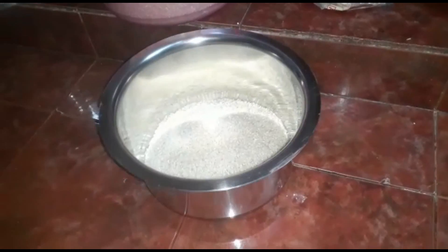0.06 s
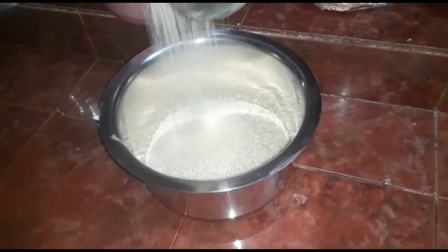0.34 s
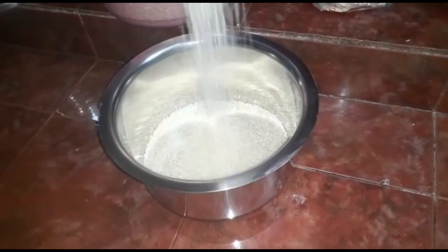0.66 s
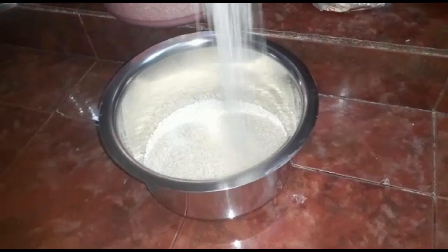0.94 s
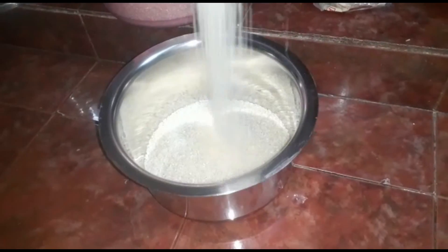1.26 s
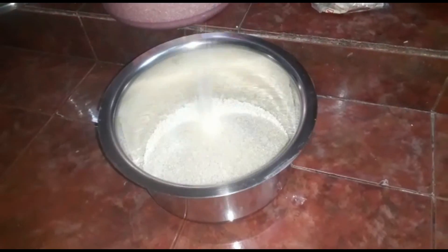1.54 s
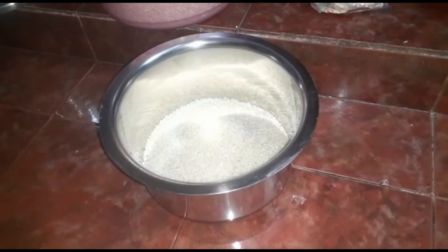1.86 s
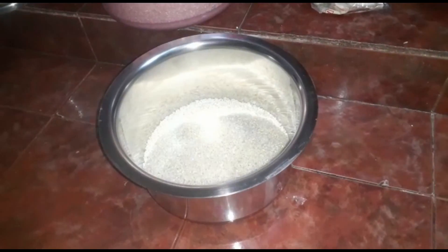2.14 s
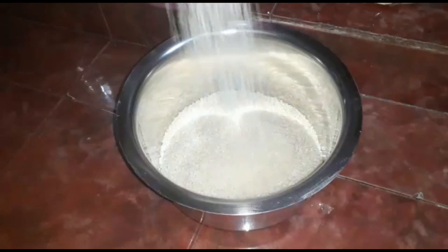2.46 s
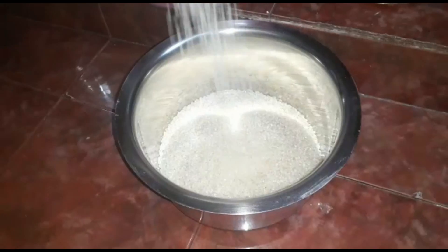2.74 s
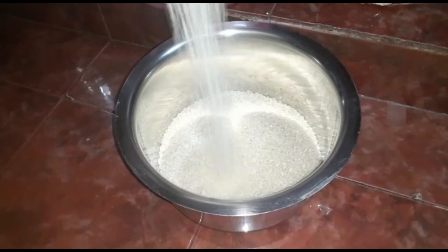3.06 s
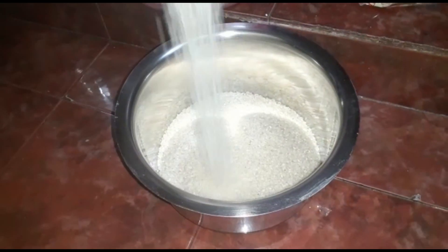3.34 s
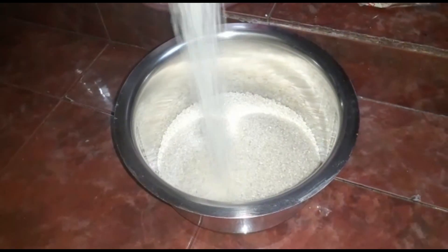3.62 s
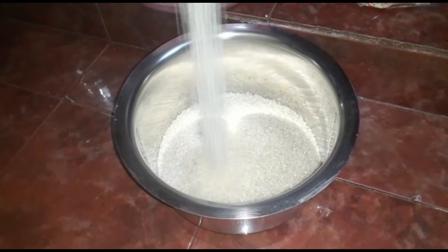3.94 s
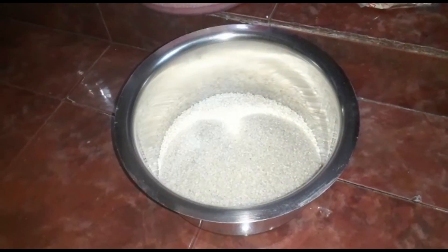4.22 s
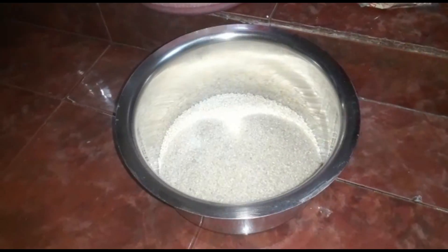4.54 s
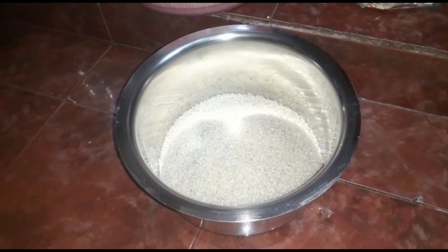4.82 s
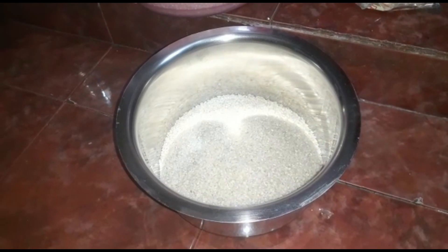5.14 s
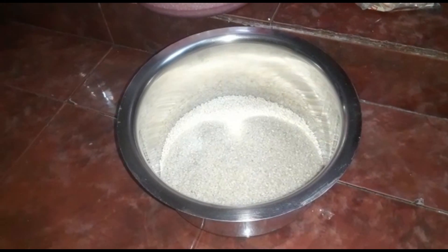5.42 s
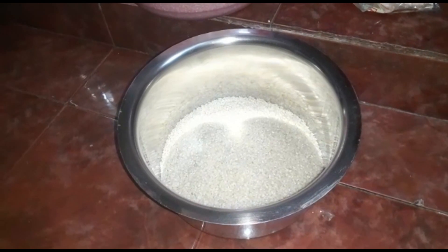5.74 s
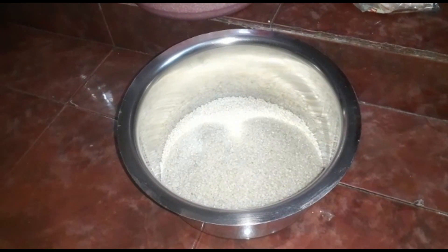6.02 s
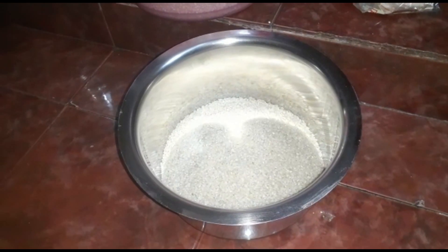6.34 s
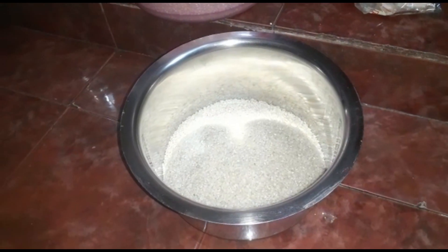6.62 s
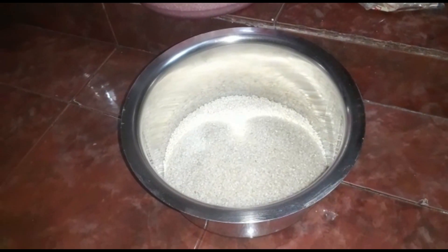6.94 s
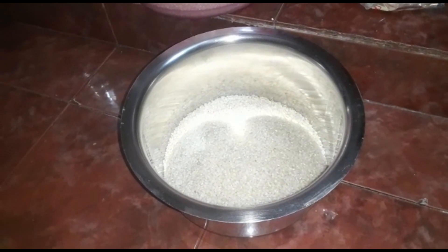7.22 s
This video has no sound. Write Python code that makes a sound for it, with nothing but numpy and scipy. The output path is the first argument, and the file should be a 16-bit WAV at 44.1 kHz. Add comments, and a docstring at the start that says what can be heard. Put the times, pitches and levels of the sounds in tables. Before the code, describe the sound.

In a tiled kitchen, raw rice streams into a steel bowl close by, hissing and crackling with a shimmering metallic ring. It pours twice, each time for under two seconds, with a quiet scrape of grains in a metal cup between. The last few seconds are much quieter: distant night insects, a dull household hum and a draught softly buffeting the microphone.

```python
"""Dry rice hisses into a ringing steel bowl, poured twice from a metal cup in a tiled kitchen.
Thousands of tiny impacts crackle on the heap and keep the bowl's modes singing; between the pours
grains rustle and scrape as the cup is refilled. Night insects shrill steadily outside, a motor hums
in the house, and a draught flutters on the two microphone ports."""
import sys
import numpy as np
from scipy import signal
from scipy.fft import rfft, irfft, next_fast_len
from scipy.io import wavfile
from scipy.ndimage import map_coordinates

SR = 44100
rng = np.random.default_rng(int(sys.argv[2]) if len(sys.argv) > 2 else 0)


def digitize_waveform(pressure):
    """Quantize a signal to 16-bit integers and store it at the path in sys.argv[1].

    Rows of a 2-D input are taken as channels; values are limited to [-1, 1].
    """
    field = np.atleast_2d(pressure).T
    bounded = np.clip(field, -1, 1)
    quanta = np.round(bounded * 32767).astype(np.int16)
    wavfile.write(sys.argv[1], SR, quanta)


N = 320607


def rice():
    """The stream hisses on the heap, rings the steel wall and rustles over the lip of the cup."""
    # bright hiss of the heap: f/Hz, level/dB
    heap_eq = [(3000, -42), (4500, -9), (5700, -5), (6150, -6), (6700, 0.5), (7400, -6), (7850, 1.5),
               (8300, -6), (9150, 1), (9900, -5.5), (10700, -3), (12300, -2), (14000, -1.5), (15600, 2.5)]
    # its stereo spread: f/Hz, left over right/dB
    heap_pan = [(6000, -5), (8000, -5.5), (8600, 8), (9300, 14), (10500, 10), (13000, 3), (14000, 3),
                (15600, -6)]
    # bowl modes; the rising heap damps the low ones: f/Hz, first pour level/dB, second pour level/dB
    bowl_modes = [(2320, -3, -8), (2409, -3, -12), (2503, -4, -4), (2587, 1, -8), (2632, -3, -6),
                  (2939, -11, -14), (3227, -9, -11), (3381, 0, -10), (3464, 1, -5), (3535, 1, 3),
                  (3590, 0, -3), (3642, 6, 7), (3739, 1, 0), (3817, 3, 0), (3911, 4, 3), (4175, 1, -5),
                  (4309, 4, 0), (4369, 5, 4), (4541, -2, -4), (4657, 1, 1), (4790, 2, 3), (4901, 4, 4),
                  (4947, 6, 5), (5063, 0, 3), (5125, 4, 6), (5190, 2, 7), (5292, 3, 0), (5430, 3, 2),
                  (5575, 1, 4), (5720, -4, 1), (5885, -7, 2), (6160, 5, 4), (6290, 3, 9), (6412, 6, 9),
                  (7827, 5, 10), (8570, 5, 5), (8926, 3, 7), (9076, 5, 9), (9356, 8, 8), (9593, 8, 5),
                  (10218, 1, 6), (10390, 3, 5), (10724, 6, 5), (10907, 3, 9), (11294, 5, 6), (11682, 6, 8),
                  (11908, 7, 9), (12640, 8, 8), (12780, 6, 11), (13092, 2, 7), (13221, 9, 9), (13792, 7, 5),
                  (13943, 7, 7), (14201, 9, 5), (14427, 10, 7), (14729, 7, 8), (15299, 9, 8)]
    # darker rustle of rice sliding out of the cup: f/Hz, level/dB
    slide_eq = [(300, -7), (800, -0.5), (1300, -3.5), (1900, 2.5), (2500, -1.5), (3050, -6.5), (3750, -5),
                (4060, -17), (8000, -35)]
    heap_gain, walls, slide_gain = stream()
    grains = impacts(rate=3600, spread_db=3.2, contact_s=0.0006) * amp(surges())
    hiss = coloured(grains + amp(-7) * ring(grains, t60=0.1), heap_eq, heap_pan)
    bowl = 0
    hz, *levels_by_pour = np.transpose(bowl_modes)
    for (gain, t60), db in zip(walls, levels_by_pour):
        bowl = bowl + steel(grains * gain, np.column_stack([hz, db]), t60, split=0.002)
    slide = coloured(impacts(rate=1100, spread_db=2.4, contact_s=0.0014), slide_eq)
    return hiss * heap_gain + bowl * sides(-0.16) + slide * slide_gain * sides(-1.9)


def stream():
    """One flow rides three faders: the heap (stereo), the steel wall (gain, t60 per pour) and the lip."""
    # how hard the rice runs, one envelope per pour: t/s, level/dB
    flows = [
        [(.254, -25), (.32, -19.5), (.38, -19.5), (.43, -19), (.6, -24), (.77, -25), (1.03, -19.5), (1.34, -18),
         (1.48, -21), (1.58, -18.5), (1.69, -16.5)],
        [(2.512, -17.5), (2.625, -14.5), (2.66, -21), (2.78, -19), (2.91, -22), (2.98, -24), (3.03, -21),
         (3.25, -17), (3.33, -20), (3.72, -18), (4.01, -22), (4.22, -20)],
    ]
    # the pours; the fuller bowl rings more briefly: start/s, stop/s, release/(dB/s), rustle over flow/dB,
    # heap left over right/dB, steel over flow/dB, steel swell as the cup tips/(dB/s), steel t60/s
    pours = [(0.244, 1.666, 108, -14, 1.5, -5.5, 2, 0.22), (2.506, 4.232, 230, -20, 3, -6.5, 4, 0.2)]
    emptying_s, emptying_db, heap_db = 0.08, -6.5, 3.8
    t = np.arange(N) / SR
    heap, walls, slide = 0, [], 0
    for (start, stop, release, rustle_db, pan_db, wall_db, wall_swell, t60), flow in zip(pours, flows):
        front_db = gate_db(start, stop, rise=2497, fall=0)  # the stream lands almost at once
        first_grains_db = -31 + gate_db(start, stop, rise=253, fall=0)  # a few grains run ahead
        flow_db = envelope(flow) + np.maximum(front_db, first_grains_db)
        flow_db -= release * np.maximum(t - stop, 0)
        tipped_s = np.clip(t, start, stop) - start
        emptied = np.clip(1 + (t - stop) / emptying_s, 0, 1)  # the last rice leaves the cup
        heap = heap + amp(flow_db + heap_db) * sides(pan_db)
        walls.append((amp(flow_db + wall_db + wall_swell * tipped_s), t60))
        slide = slide + amp(flow_db + rustle_db + emptying_db * emptied)
    return heap, walls, slide


def surges():
    """The stream falls in uneven strands, now and then in a clump: dB around its flow."""
    # clumps that land at once: t/s, boost/dB, decay time/s
    clumps = [(0.253, 7, .012), (.311, 4, .005), (.332, 5, .004), (.662, 6, .012), (.68, 7, .01),
              (.78, 6, .008), (1.119, 5, .008), (1.316, 4, .006), (1.5, 5, .006), (2.535, 3, .005),
              (2.682, 5, .008), (2.759, 5, .016), (2.95, 6, .008), (2.991, 11, .026), (3.408, 4, .006),
              (3.891, 4, .008)]
    small_per_s, small_db, small_decay_s = 16, 3, 0.01  # lesser clumps fall at random
    t = np.arange(N) / SR
    clumps_db = sum(db * (t >= s) * np.exp(-np.abs(t - s) / decay) for s, db, decay in clumps)
    small_hits = small_db * (rng.random(N) < small_per_s / SR)
    small_clumps_db = signal.lfilter([1], [1, -np.exp(-1 / (small_decay_s * SR))], small_hits)
    strands_db = 0.29 * wobble(45) + 0.24 * wobble(18)
    return clumps_db + strands_db + small_clumps_db


def impacts(rate, spread_db, contact_s):
    """Grains land at random, rate a second; each is a tiny crackle of its own size."""
    lands = rng.random(N) < rate / SR
    size = amp(spread_db * np.minimum(rng.standard_normal(N), 2))
    energy = signal.lfilter([1], [1, -np.exp(-2 / (contact_s * SR))], lands * size ** 2)
    return unit(np.sqrt(energy) * noise())


def steel(x, modes, t60, split):
    """x rings steel modes (f/Hz, level/dB), each a beating pair detuned by a share of its pitch."""
    shimmer_db, bend_share = 1.5, 0.0016
    hz, db = np.transpose(modes)
    hz, db = np.outer(hz, [1 - split, 1 + split]).ravel(), np.repeat(db, 2)
    t = np.arange(SR) / SR
    out, block = np.zeros((2, N)), SR // 8
    for start in range(0, N, block):
        # as the point of impact wanders, each mode is struck harder or softer and bends a little
        strength, bend = rng.standard_normal((2, len(hz)))
        phase = rng.random((2, len(hz)))
        part = x[:, start:start + block]
        if np.abs(part).max() > 1e-4:
            bent_hz = np.rint(hz * (1 + bend_share * bend)).astype(int)
            lines = np.zeros((2, SR // 2 + 1), complex)
            lines[:, bent_hz] = amp(db + shimmer_db * strength) * np.exp(2j * np.pi * phase)
            tail = irfft(lines) * amp(-60 * t / t60)
            add(out, start / SR, signal.fftconvolve(part, tail / np.linalg.norm(tail[0]), axes=1))
    return out


def loose_grains():
    """Rice shifts in the cup before each pour with a fine, dry rustle."""
    # the shifts: start/s, stop/s, level/dB
    shifts = [(0, 0.254, -34.5), (1.844, 2.013, -33), (2.123, 2.514, -31.8)]
    # their tone: f/Hz, level/dB
    rustle_eq = [(1500, -7.5), (5900, -13.5), (6200, 6.5), (7700, 3.5), (8150, 1), (9000, -10),
                 (10500, -64), (11400, -25), (11700, 0), (15600, -1.5)]
    gain = sum(amp(db + gate_db(start, stop, rise=197, fall=197)) for start, stop, db in shifts)
    grains = impacts(rate=2500, spread_db=2.2, contact_s=0.0008) * amp(0.8 * wobble(40))
    return coloured(grains, rustle_eq) * gain * sides(-3.5)


def stray_grain(s, db, t60):
    """One grain drops into the bowl: a tick of fast-dying noise."""
    # its bright tone: f/Hz, level/dB
    tick_eq = [(4000, -30), (8500, 0), (15600, 0)]
    age = np.arange(N) / SR - s
    return coloured(noise(), tick_eq) * (age >= 0) * amp(db - 60 * np.abs(age) / t60)


def scoop():
    """Grains scrape the thin metal cup as it is refilled and keep its modes singing."""
    # envelope of the scrape: t/s, level/dB
    stroke = [(1.5, -42), (1.72, -32), (1.92, -34), (2.2, -45.5), (2.45, -45.5), (2.6, -35)]
    # the cup's modes: f/Hz, level/dB
    cup_modes = [(2320, -8), (2635, -6), (2939, -7), (3225, -11), (3435, -3), (3467, 0), (3523, 1),
                 (3817, -6), (3940, -6), (4369, -3), (4624, -4), (4770, -6), (4891, -1), (4925, -2),
                 (5125, -6), (5292, 0), (5440, -6), (5730, -7), (6195, -2), (6288, -1), (7582, 0),
                 (8646, -6), (9475, -8)]
    gain = amp(envelope(stroke, outside=-120))
    scrape = impacts(rate=1700, spread_db=4.5, contact_s=0.00041) * gain
    return steel(scrape, cup_modes, t60=0.48, split=0.0012) * sides(-1.5)


def knocks():
    """Light bumps against the cup: a short crack, a hollow, damped note and a faint metal ring."""
    # the bumps: t/s, relative level/dB, left over right/dB
    bumps = [(0.212, -25, -1), (1.037, -14, -16), (1.076, -19, -17)]
    # what they ring: f/Hz, level/dB, t60/s
    modes = [(150, -13, 0.037), (1140, -2.5, 0.032), (1104, 0.5, 0.028), (2240, 0, 0.019), (2612, -12, 0.6),
             (3464, -23, 0.52)]
    out, t = np.zeros((2, N)), np.arange(SR) / SR
    note = sum(amp(db - 60 * t / t60) * np.sin(2 * np.pi * hz * t) for hz, db, t60 in modes)
    for s, db, pan_db in bumps:
        grit = unit(signal.lfilter(*signal.butter(2, 4000, fs=SR), rng.standard_normal((2, len(t)))))
        crack = 0.77 * amp(-60 * t / 0.081) * grit
        add(out, s, amp(db - 5.5) * sides(pan_db) * (note + crack))
    return out


def scuffs():
    """Fingers shift their grip: brief, soft rubs."""
    # the rubs: t/s, level/dB
    rubs = [(7.143, -35.5), (7.163, -44)]
    # their midrange tone: f/Hz, level/dB
    rub_eq = [(800, -22), (1400, -3), (1850, 2), (2400, -15), (5000, -45)]
    gain = sum(amp(db + gate_db(s, s, rise=4000, fall=700)) for s, db in rubs)
    return coloured(noise(), rub_eq) * gain


def tiles(x):
    """Hard kitchen tiles throw back a reverb that lingers longest in the upper mids."""
    # reverb time: f/Hz, t60/s
    decay = [(500, 0.18), (2500, 0.97), (4500, 0.56), (15000, 0.34)]
    return ring(x, t60=lambda hz: along(decay, hz))


def insects():
    """Many far insects rasp in one narrow band, pulsing with the chirps of the nearest."""
    # swell of the chorus: t/s, level/dB
    chorus = [(0, -28.5), (.5, -37), (1.7, -33.5), (2.1, -38.5), (2.45, -32), (4.3, -34), (4.6, -35.5),
              (5.1, -33), (5.6, -32.5), (5.85, -29.5), (6.4, -29), (7.27, -29.5)]
    # its shrill band: f/Hz, level/dB
    shrill_eq = [(5800, -110), (6400, -35.5), (6680, -7), (6900, -7.5), (7170, -0.5), (7400, -12),
                 (7650, -53), (8200, -53)]
    # faint fizz that rises and falls with it: f/Hz, level/dB
    fizz_eq = [(8500, -25.5), (10900, 1), (12200, -7), (15600, 2.5)]
    chirp_hz = 10.9 + 0.34 * wobble(2.77)
    pulse_db = 1.2 * np.sin(2 * np.pi * np.cumsum(chirp_hz) / SR) + 0.8 * wobble(160)
    song = coloured(noise() + amp(3.5) * ring(noise(), t60=0.31), shrill_eq)
    fizz = coloured(noise(), fizz_eq) * amp(-23 + wobble(14))
    return (unit(song * amp(pulse_db)) * sides(-4.5) + fizz) * amp(envelope(chorus))


def draught():
    """Gusts flutter on each port separately and carry small eddies; strong eddies thud one by one."""
    # gusts, most favouring one port: start/s, length/s, level/dB, left over right/dB
    gusts = [(0.0, 0.025, -21, 33), (0.04, 0.14, -31, -18), (0.092, 0.15, -33, 18), (0.496, 0.11, -25, 34),
             (0.685, 0.065, -27.5, -22), (0.776, 0.93, -34, 10), (0.99, 0.046, -24, -18),
             (1.396, .042, -33, -16), (1.484, 0.15, -26, 10), (1.79, 0.21, -28, -8),
             (2.253, 0.29, -25.5, 10), (2.426, 0.21, -28.5, -23), (2.59, 0.13, -29.5, 23),
             (3.094, 0.17, -24.5, 3), (3.327, 0.13, -22.5, 21), (3.544, 0.31, -29.5, 24),
             (3.855, 0.17, -23, 7), (4.01, 0.18, -29.5, -3), (4.821, 0.079, -29.5, -10),
             (4.926, 0.073, -30.5, 20), (5.096, 0.19, -23.5, 10), (5.28, 0.39, -28, 14),
             (5.475, 0.26, -22.5, 13), (6.096, 0.38, -32.5, 12), (6.448, 0.13, -25.5, 17),
             (6.865, 0.042, -25.5, 6), (7.03, 0.17, -34, 18)]
    # low rumble of the air: f/Hz, level/dB
    air_eq = [(20, -27), (40, -37), (70, -1.5), (115, 4), (190, -0.5), (300, -8.5), (450, -16), (700, -68),
              (1500, -55), (4000, -96)]
    # the strongest eddies: t/s, level/dB, f/Hz, left over right/dB
    eddies = [(0.499, -11, 156, 30), (.589, -5.5, 191, 28), (1.599, -10.5, 218, 17), (1.782, -13, 200, -16),
              (2.291, -9, 212, 29), (2.483, -11, 151, 15), (3.22, -14, 240, 46), (3.36, -12.5, 215, 24),
              (3.458, -11, 157, 30), (3.794, -9.5, 190, -23), (3.804, -10, 160, -17), (3.951, -8, 218, 26),
              (3.978, -12, 520, 28), (3.982, -13, 260, 28), (4.014, -10, 192, -35),
              (4.104, -12.5, 150, -15), (5.123, -17, 148, 13), (5.184, -5, 176, 22), (5.237, -14, 160, 15),
              (5.361, -12.5, 141, 23), (5.526, -6, 187, 24), (5.547, -7.5, 243, 25), (5.598, -9.5, 228, 22),
              (5.638, -12, 210, 23), (7.139, -12.5, 170, 20), (7.189, -13, 192, 26)]
    calm_db, small_eddies_per_s = -45.5, 7.6
    gust_gains = [amp(db + gate_db(s, s + length, rise=709, fall=247)) * sides(pan_db)
                  for s, length, db, pan_db in gusts]
    push = np.sqrt(amp(calm_db) ** 2 + sum(gain ** 2 for gain in gust_gains))
    flutter = amp(2.2 * np.array([wobble(65), wobble(65)]))
    hits = (rng.random((2, N)) < small_eddies_per_s / SR).astype(float)
    small_eddies = signal.fftconvolve(hits, thud(hz=233)[None], "same")
    rumble = unit(coloured(noise(), air_eq) * flutter)
    out = (rumble + amp(2.5) * small_eddies) * push
    for s, db, hz, pan_db in eddies:
        eddy = thud(hz)
        add(out, s - len(eddy) / 2 / SR, amp(db) * sides(pan_db) * eddy)
    return out


def thud(hz):
    """One eddy: a brief suction between two smaller pushes, with a rough edge of small whirls."""
    t = np.arange(-SR // 50, SR // 50) / SR
    u = (np.pi * hz * t / 1.1) ** 2
    pressure = (2 * u - 1) * np.exp(-u)
    band = signal.cheby1(4, 1, [240, 560], "band", fs=SR, output="sos")
    whirls = unit(signal.sosfilt(band, rng.standard_normal(len(t))))
    return (pressure + 0.12 * whirls * np.exp(-np.abs(t) / 0.0061)) * np.hanning(len(t))


def house():
    """Dull room tone and a slightly unsteady motor hum."""
    # fader for both: t/s, level/dB
    fader = [(0.0, -39), (1.54, -45.5), (1.82, -43.5), (3.95, -42), (4.37, -43), (7.27, -40)]
    # colour of the room tone: f/Hz, level/dB
    room_eq = [(25, -19), (110, 8.5), (250, 3), (560, -6), (700, -6.5), (880, -4.5), (1080, -12),
               (1350, -10), (2000, -16.5), (3200, -23), (4900, -27.5), (5700, -106), (11000, -41),
               (15500, -51)]
    # its stereo spread: f/Hz, left over right/dB
    room_pan = [(100, 2), (500, 1), (900, -0.5), (2000, -1), (5000, -4), (9000, 18)]
    # the motor's partials: f/Hz, level before the fader/dB
    partials = [(104, -17), (474, -6.5), (581, -16)]
    centre = rng.standard_normal(N)
    room_tone = coloured(noise() + 0.63 * centre, room_eq, room_pan) * amp(8.5)
    t = np.arange(N) / SR
    hum = sum(amp(db) * np.sqrt(2) * np.sin(2 * np.pi * hz * t + 1.07 * wobble(14))
              for hz, db in partials)
    return (room_tone + hum) * amp(envelope(fader))


def amp(db):
    """Decibels as a gain."""
    return 10 ** (np.asarray(db) / 20)


def unit(x):
    """x at rms 1."""
    return x / np.sqrt(np.mean(x ** 2) + 1e-20)


def along(points, hz):
    """Read (f/Hz, value) points on a log axis."""
    f, v = np.transpose(points)
    return np.interp(np.log(hz + 1), np.log(f), v)


def envelope(points, outside=None):
    """One value per sample from (t/s, value) points; the ends hold unless outside is given."""
    return np.interp(np.arange(N) / SR, *np.transpose(points), left=outside, right=outside)


def gate_db(start, stop, rise, fall):
    """Attack, hold and release in dB; rise and fall in dB a second."""
    t = np.arange(N) / SR
    return -np.minimum(rise * np.maximum(start - t, 0) + fall * np.maximum(t - stop, 0), 200)


def wobble(rate):
    """A smooth random curve, rate knots a second."""
    return map_coordinates(rng.standard_normal(int(N * rate / SR) + 4), [np.arange(N) * rate / SR])


def sides(db):
    """Left and right gains of constant power for a level difference."""
    gains = amp(np.array([[.5], [-.5]]) * db)
    return gains / np.sqrt(np.mean(gains ** 2, axis=0))


def filtered(x, response):
    """x shaped by a frequency response."""
    m = next_fast_len(N + SR // 2)
    return irfft(rfft(x, m) * response(np.fft.rfftfreq(m, 1 / SR)), m)[..., :N]


def coloured(x, spectrum, balance=((1000, 0),)):
    """A stereo signal given a spectrum and a balance, at rms 1."""
    return unit(filtered(x, lambda hz: amp(along(spectrum, hz)) * sides(along(balance, hz))))


def noise():
    """Unrelated white noise for each side."""
    return rng.standard_normal((2, N))


def add(track, s, sound):
    """Mix a stereo sound in at time s."""
    start = max(round(s * SR), 0)
    part = track[:, start:start + sound.shape[1]]
    part += sound[:, :part.shape[1]]


def ring(x, t60):
    """x through a dense set of modes that die in t60 (seconds, or a function of Hz)."""
    hz, t, z = signal.stft(rng.standard_normal((2, SR // 2)), SR, nperseg=256)
    life = t60(hz)[:, None] if callable(t60) else t60
    tail = signal.istft(z * amp(-60 * t / life), SR, nperseg=256)[1]
    return signal.fftconvolve(x, tail / np.linalg.norm(tail[0]), axes=1)[:, :N]


def scene():
    """The pouring and its echo off the tiles, over insects, house and draught."""
    near = rice() + loose_grains() + stray_grain(s=2.061, db=-25.5, t60=0.05)
    near += scoop() + knocks() + scuffs()
    return near + amp(-10) * tiles(near) + insects() + house() + draught()


def record(dry):
    """Soft clipping rounds off the tallest peaks; a steep low-pass takes off the very top."""
    ceiling, top_hz = 0.95, 15760
    rounded = dry / (1 + np.abs(dry / ceiling) ** 8) ** (1 / 8)
    return filtered(rounded, lambda hz: .5 - .5 * np.tanh((hz - top_hz) / 30))


dry = scene()
out = record(dry)
digitize_waveform(out)
```